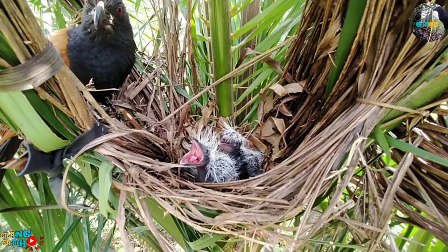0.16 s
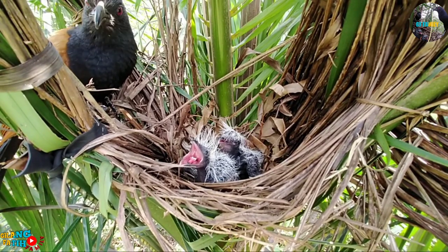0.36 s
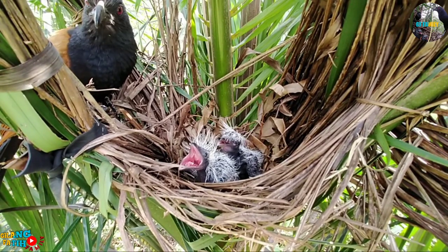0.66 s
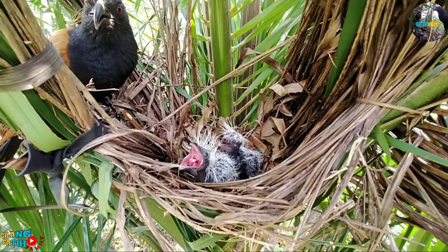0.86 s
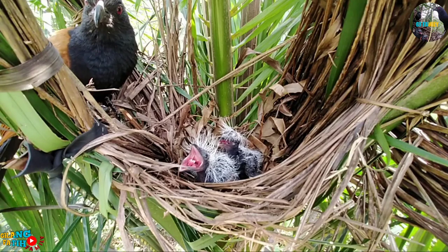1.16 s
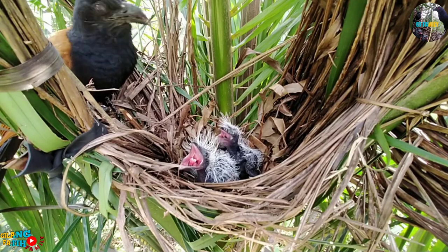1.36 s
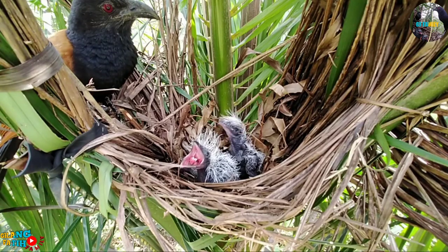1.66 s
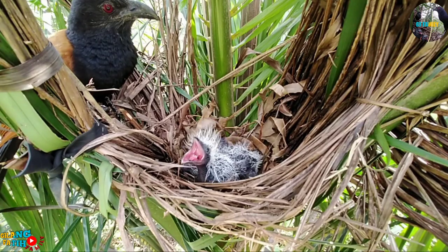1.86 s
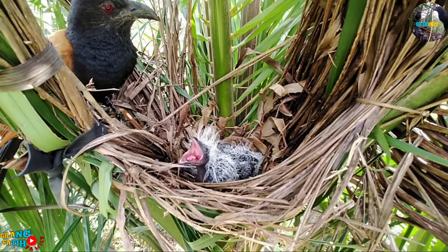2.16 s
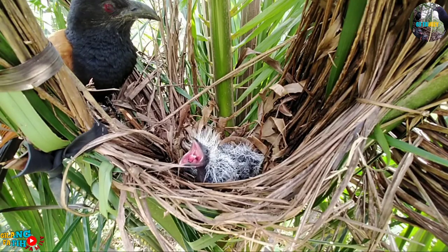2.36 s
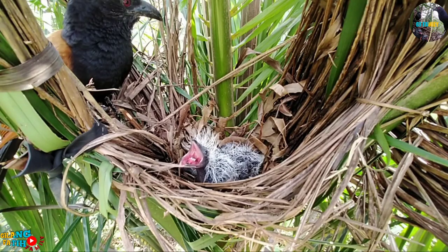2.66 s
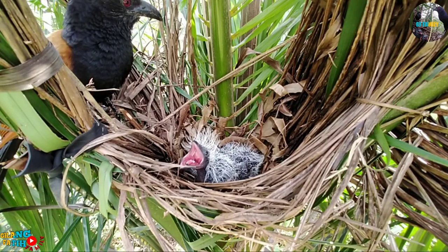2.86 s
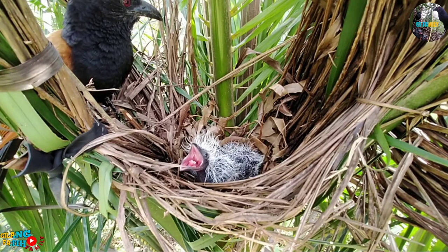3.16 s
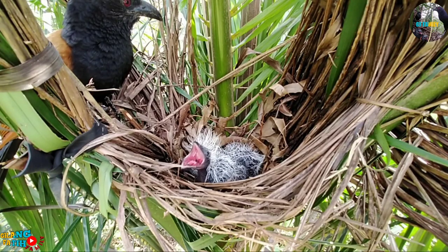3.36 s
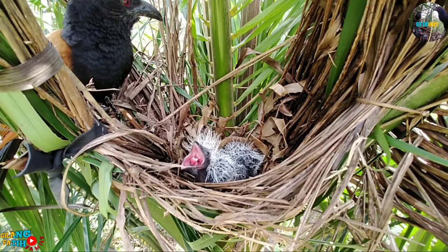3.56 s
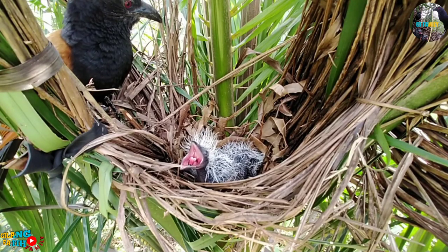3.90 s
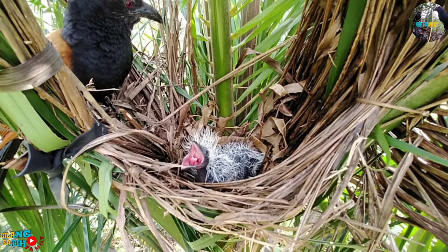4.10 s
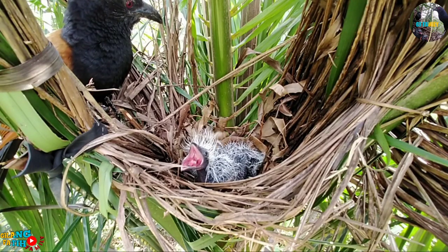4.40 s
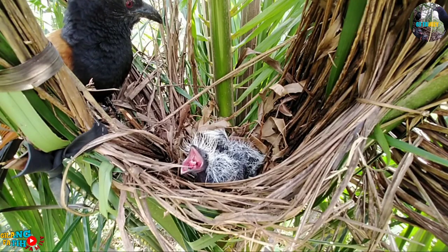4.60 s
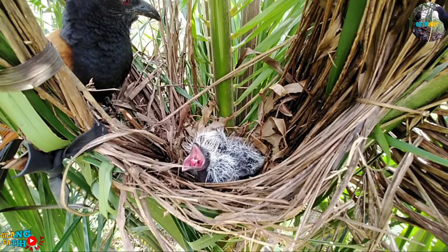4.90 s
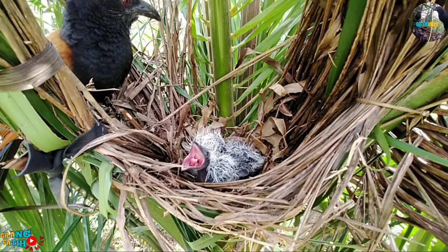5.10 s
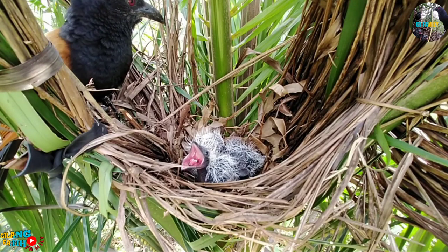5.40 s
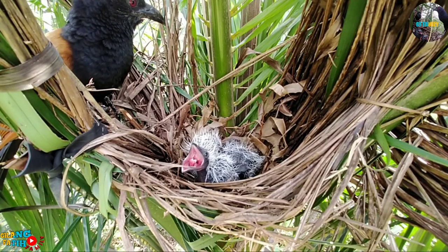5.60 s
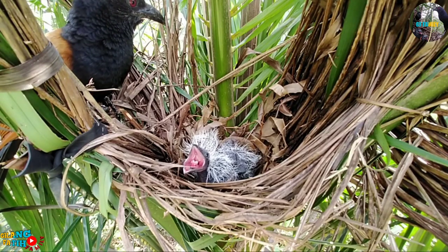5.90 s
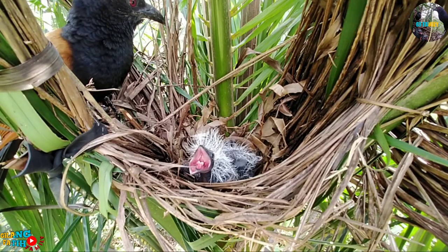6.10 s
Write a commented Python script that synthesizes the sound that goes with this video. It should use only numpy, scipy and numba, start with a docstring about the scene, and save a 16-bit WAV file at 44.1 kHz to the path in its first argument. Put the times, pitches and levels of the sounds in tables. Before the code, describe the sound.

Bright, gritty hissing calls dominate from the start, each swelling and dying with tiny gaps filled by faint wheezing air. Four long calls give way to steady short pulses, about three a second. Small hoarse peeps from another nestling sit beneath. Distant birds give short whistles and a quick trilled phrase three times. Close, centred pickup in open leafy surroundings, little reverberation, low wind and engine rumble.

```python
"""From the start two nestlings beg in a nest of dry palm leaves, close up, over wind rumble and a far engine's drone.
One rasps in pushes, in long calls and then mostly short ones: irregular clicks of the syrinx ring throat
and beak and crowd into a hiss, with faint wheezing air between. The other squeaks softly in arched notes.
From 0.65 s birds further off whistle, gliding tones; at 1.8, 2.8 and 5.6 s dry leaves crackle under the chicks.
From 2.4 s one of the birds sings a trilled phrase, three times in all."""
import sys
import numpy as np
from scipy import signal
from scipy.fft import rfft, irfft
from scipy.io import wavfile
from scipy.ndimage import uniform_filter1d
from numba import njit

SR = 44100
rng = np.random.default_rng(int(sys.argv[2]) if len(sys.argv) > 2 else 0)


def generate_wav(signal):
    """Clip the signal to [-1, 1] and save it as 16-bit WAV at the path in sys.argv[1]."""
    frames = np.transpose(np.atleast_2d(signal))
    scaled = np.clip(frames, -1, 1) * 32767
    pcm = np.round(scaled).astype(np.int16)
    wavfile.write(sys.argv[1], SR, pcm)


N = 275625
TIME = np.arange(N) / SR  # [s]


def undb(db):
    """Decibels to gain."""
    return 10 ** (np.asarray(db) / 20)


def unit(x):
    """Scale to rms 1."""
    return x / np.sqrt(np.mean(x ** 2))


def curve(rows):
    """Join (time [s], value) rows by straight lines."""
    return np.interp(TIME, *np.transpose(rows))


def walk(rate):
    """Smooth random wander with a spread near 1, taking this many steps a second."""
    steps = rng.standard_normal(N // 10)
    return np.interp(TIME * rate, np.arange(len(steps)), steps)


def ring(modes, size=2048):
    """Causal response, of energy 1, of a cavity with steep resonances."""
    f = np.arange(size // 2 + 1) * SR / size
    power = sum(undb(db) ** 2 / (1 + (2 * (f - hz) / width) ** 2) ** 2 for hz, width, db in modes)
    # folding the cepstrum to positive times gives minimum phase
    cepstrum = irfft(np.log(power))[:size // 2]
    cepstrum[0] /= 2
    response = irfft(np.exp(rfft(cepstrum, size)))
    return response / np.sqrt(np.sum(response ** 2))


def through(x, response):
    """Pass a sound through a response."""
    return signal.fftconvolve(x, response)[:N]


def highpass(x, order, hz):
    """Remove what lies below a frequency."""
    return signal.sosfilt(signal.butter(order, hz, "high", fs=SR, output="sos"), x)


def samples_of(start, length):
    """Indices of the samples that an event covers."""
    return np.flatnonzero((TIME >= start) & (TIME < start + length))


def note(start, length):
    """A note: its samples, the time since its start and its rounded envelope."""
    span = samples_of(start, length)
    t = TIME[span] - start
    return span, t, np.sqrt(np.abs(np.sin(np.pi * t / length)))


def pure_tone(hz):
    """A sine that follows a moving pitch, rms 1."""
    return unit(np.sin(2 * np.pi * np.cumsum(hz) / SR))


def foliage(x, wet_db, t60):
    """Leaves scatter a short diffuse tail behind the direct sound."""
    t = TIME[:SR // 2]
    tail = rng.standard_normal(len(t)) * undb(-60 * t / t60)
    return x + undb(wet_db) * through(x, tail / np.sqrt(np.sum(tail ** 2)))


# resonances of the engine drone: (frequency [Hz], width [Hz], level [dB])
ENGINE_MODES = [(60.6, 11.3, 0.5), (92.9, 7.4, 3), (121.6, 14.7, 1), (157.2, 17, 0), (194.7, 11, -0.5),
                (242.68, 52, -5.5)]
# drone level ahead of its trim: (time [s], level [dB])
ENGINE_LEVEL = [(0.0, -35.5), (0.98, -33.5), (1.68, -39), (5.49, -36), (6.1, -39.5)]


def engine(trim_db=-0.5):
    """A far engine drones: noise through narrow low resonances."""
    drone = through(rng.standard_normal(N), ring(ENGINE_MODES, size=32768))
    return unit(drone) * undb(curve(ENGINE_LEVEL) + trim_db)


# relative spectrum of the open air: (frequency [Hz], density [dB per Hz])
AIR_SPECTRUM = [(25, 6), (60, 3), (130, 0.5), (240, -10.5), (320, -7.5), (500, -9.5), (900, -8),
                (1500, -27), (3000, -31), (5000, -53), (9000, -40), (15000, -16.5)]
# wind level around which it swells: (time [s], level [dB])
WIND_LEVEL = [(0, -36), (2, -40), (4.3, -42), (5.5, -37)]


def wind(swell_db=2.5):
    """Soft wind rumble with a faint hiss: shaped noise that swells a little."""
    hz, density_db = np.transpose(AIR_SPECTRUM)
    f = np.maximum(np.arange(N // 2 + 1) * SR / N, 1)
    shape = undb(np.interp(np.log(f), np.log(hz), density_db))
    noise = irfft(rfft(rng.standard_normal(N)) * shape, N)
    return unit(noise) * undb(curve(WIND_LEVEL) + swell_db * walk(3.6))


# level or gliding bird notes: (time [s], length [s], start pitch [Hz], end pitch [Hz], level [dB])
WHISTLES = [(0.651, 0.03892, 4200, 4130, -36), (0.816, 0.03807, 4090, 4040, -27.5),
            (2.095, 0.047335, 4600, 5400, -44), (3.1, .26, 2045, 2066, -41.5),
            (3.29, 0.054, 2850, 2800, -43), (3.304, 0.0463, 3500, 5200, -48),
            (3.343, 0.03, 4000, 3200, -28.5), (4.245, .119, 2290, 2293, -52.5),
            (4.309, 0.071, 2500, 4320, -43), (5.276, .117, 2009, 1999, -42)]


def whistles(waver=0.00646):
    """Birds in the trees whistle single notes, pure tones whose glide levels off."""
    out, bend = np.zeros(N), 1 + waver * walk(200)
    for start, length, from_hz, to_hz, db in WHISTLES:
        span, t, envelope = note(start, length)
        hz = to_hz + (from_hz - to_hz) * (1 - t / length) ** 2
        out[span] += pure_tone(hz * bend[span]) * envelope ** 2 * undb(db)
    return out


def arch(u, from_hz, turn_hz, to_hz, place):
    """Pitch that eases into a turning point and curves away to its end as u runs from 0 to 1."""
    place = np.clip(place, .02, .98)
    before = (from_hz - turn_hz) * (1 - u / place) ** 2
    after = (to_hz - turn_hz) * ((u - place) / (1 - place)) ** 2
    return turn_hz + np.where(u < place, before, after)


# pip, trilled fall and rise: (time into the phrase [s], length [s], start pitch [Hz], turning pitch [Hz],
# end pitch [Hz], place of the turn [0-1], level within the song [dB], trill depth [Hz])
PHRASE = [(0, .025, 4048, 4200, 4143, .4, 0, 0), (.024, 0.033, 4100, 3830, 3420, 0.09, -3.5, 460),
          (0.067, .045, 3090, 3855, 3830, .45, -3.5, 80)]
# each singing of the phrase: (time [s], level [dB])
SONGS = [(2.404, -31), (4.605, -30.5), (5.949, -32)]


def songs(waver=0.00646, trill_hz=115):
    """A small bird repeats a phrase of curved pure tones, some shaken by a fast trill."""
    out, bend = np.zeros(N), 1 + waver * walk(200)
    for start, song_db in SONGS:
        for after, length, *shape, db, depth_hz in PHRASE:
            span, t, envelope = note(start + after, length)
            trill = depth_hz * np.sin(2 * np.pi * trill_hz * t)
            hz = arch(t / length, *shape) + trill
            out[span] += pure_tone(hz * bend[span]) * envelope ** 2 * undb(song_db + db)
    return out


# resonances of a dry leaf: (frequency [Hz], width [Hz], level [dB])
LEAF_MODES = [(2310.5, 2600, -1), (6500, 1150, 0.5), (7997, 1800, 2.5), (11856, 1500, -4), (14155, 3480, 4)]
# chicks shift on the dry leaves: (time [s], length [s], level into the leaf [dB], density [crackles/s])
RUSTLES = [(1.78, 0.06, -22.5, 826.5), (2.793, 0.061, -29.5, 3000), (5.634, 0.066, -36, 1360)]


def rustles(scatter_db=-2.0):
    """Short flurries of random snaps of either sign ring the dry leaves."""
    snaps = np.zeros(N)
    for start, length, db, rate in RUSTLES:
        span = samples_of(start, length)
        count = len(span)
        struck = rng.random(count) < rate / SR
        strength = undb(scatter_db * rng.standard_normal(count)) * rng.choice([-1, 1], count)
        snaps[span] += unit(struck * strength * np.hanning(count) ** .5) * undb(db)
    return through(snaps, ring(LEAF_MODES))


SCOOP_S, DROP_HZ, DROP_S = 0.0357, 110, 0.03  # pitch scoops up at the start and drops at the end
SPEAK_S, FADE_POWER = 0.016, 0.25  # a squeak speaks quickly and then fades
HOARSE_PER_S = 1.5  # phase flutter [rad] for each second of note length
# the second chick: (time [s], length [s], pitch [Hz], scoop up to it [Hz], sag over the note [Hz],
# level ahead of the envelope [dB], throat resonance [Hz])
SQUEAKS = [(-.02, .058, 830, 100, 29, -37, 1251), (0.181, .19, 906, 79.6, 80.5, -24.5, 2700),
           (.432, 0.21, 886, 70, 35.5, -24, 2580), (0.844, 0.21, 872.5, 70.2, 25, -23.5, 2620),
           (1.105, 0.11, 901, 60.1, 62, -24.5, 2740), (1.39, .118, 1169, 448, 260.5, -22.5, 2570),
           (1.787, 0.052, 992, 130.7, -45, -28, 1567), (1.933, 0.05, 1096, 140, 62, -28, 1660),
           (2.544, 0.045, 1054, 99.4, 43, -25.5, 1780), (2.678, 0.059, 1030, 99.7, 68, -34, 1598),
           (3.196, 0.0483, 1044, 120.4, 13, -31, 1400), (3.56, 0.066, 1061, 90.1, 96, -31, 1199),
           (4.944, 0.058, 893, 190.8, 36, -28, 1400), (6.058, 0.057, 1051, 100, 60, -26, 1856),
           (6.21, 0.065, 1015, 110, -20, -27, 1820)]


def squeaks(waver=0.0098, drift=0.0087, shimmer_db=3, throat_width_hz=1000, throat_db=23.0, slope_db=-9):
    """Nasal arched notes of five harmonics, the long ones hoarse; the throat lifts harmonics near its resonance."""
    out = np.zeros(N)
    bend = 1 + waver * walk(250) + drift * walk(25)
    tremble = undb(shimmer_db * walk(150))
    flutter = walk(600)  # uneven cycles smear the upper harmonics most
    k = np.arange(1, 6)[:, None]  # harmonic numbers
    for start, length, pitch_hz, scoop_hz, sag_hz, db, throat_hz in SQUEAKS:
        span, t, _ = note(start, length)
        envelope = np.minimum(t / SPEAK_S, 1) * np.abs(1 - t / length) ** FADE_POWER
        scoop = np.maximum(1 - t / SCOOP_S, 0) ** 2
        drop = np.maximum(1 - (length - t) / DROP_S, 0) ** 2
        hz = (pitch_hz - sag_hz * t / length - scoop_hz * scoop - DROP_HZ * drop) * bend[span]
        throat = undb(throat_db) / (1 + (2 * (k * hz - throat_hz) / throat_width_hz) ** 2) ** 2
        gain = undb(slope_db * np.log2(k)) * (1 + throat)
        phase = 2 * np.pi * np.cumsum(hz) / SR + HOARSE_PER_S * length * flutter[span]
        tone = np.sum(gain * np.sin(k * phase), axis=0)
        out[span] += unit(tone) * envelope * tremble[span] * undb(db)
    return out


# open beak as the air wheezes through: (frequency [Hz], width [Hz], level [dB])
WHEEZE_MODES = [(2745.3, 4300, -9), (6230, 1500, -40.5), (8130, 540, 1.5), (9430, 1800, -0.5),
                (11700, 2000, -17.5), (14660, 1460, -9)]


def wheeze():
    """Air noise whistles faintly through the open beak all along, heard between rasps."""
    db = curve([(end, wheeze_db) for _, end, _, wheeze_db in RASPS])
    return through(rng.standard_normal(N), ring(WHEEZE_MODES)) * undb(db + 2.2 * walk(70))


ATTACK_S, RELEASE_S, EDGE_POWER = .048, .06, .7  # every rasp swells and dies away alike
TIRE_AFTER_S, TIRE_DB_PER_S = .29, 11  # a long rasp runs out of air
# pressure sinks slowly into a lull, comes back quickly and overshoots a moment later
SINK_S, RECOVER_S, SURGE_DB, SURGE_AFTER_S, SURGE_S = .042, .021, 1.32, .055, .03
# begging rasps: (start [s], end [s], pressure ahead of tiring and lulls [dB],
# wheeze around which it wavers at the rasp's end [dB])
RASPS = [(-.2, 0.043, -8.5, -41.5), (0.12, 0.616, -8.5, -41), (0.696, 1.182, -8.5, -36),
         (1.263, 1.745, -7.5, -31), (1.83, 2.092, -8, -40), (2.147, 2.413, -8.5, -40.5),
         (2.479, 2.792, -8, -32.5), (2.866, 3.289, -8.5, -41), (3.366, 3.631, -8, -38),
         (3.676, 3.946, -8.5, -43.5), (4.022, 4.295, -8.5, -42), (4.36, 4.633, -9, -41),
         (4.703, 4.962, -7, -34), (5.015, 5.286, -7.5, -42.5), (5.35, 5.629, -8, -32.5),
         (5.7, 5.969, -7.5, -41), (6.029, 6.302, -7, -41.5)]
# the chick eases off between pushes: (time [s], depth [dB])
LULLS = [(.309, 12), (.466, 4.5), (.868, 7.5), (1.033, 8), (1.447, 8.5), (1.598, 7), (1.958, 3.5),
         (2.274, 3.5), (2.638, 5), (2.987, 4), (3.137, 11), (3.482, 4.5), (3.803, 5), (4.156, 4.5),
         (4.486, 4.5), (4.824, 3.5), (5.138, 3), (5.491, 4), (5.82, 2.5), (6.158, 3.5)]


def pressure():
    """Air pressure of the rasping chick, as a gain: attack, hold and release, with a surge after each lull."""
    push = np.zeros(N)
    for start, end, db, _ in RASPS:
        edges = np.clip((TIME - start) / ATTACK_S, 0, 1) * np.clip((end - TIME) / RELEASE_S, 0, 1)
        tired_db = TIRE_DB_PER_S * np.maximum(TIME - start - TIRE_AFTER_S, 0)
        push += edges ** EDGE_POWER * undb(db - tired_db)
    eased_db, surge_db = np.zeros(N), np.zeros(N)
    for s, depth_db in LULLS:
        eased_db += depth_db * np.exp(-np.maximum((s - TIME) / SINK_S, (TIME - s) / RECOVER_S))
        surge_db += SURGE_DB * np.exp(-((TIME - s - SURGE_AFTER_S) / SURGE_S) ** 2)
    return uniform_filter1d(push * undb(surge_db - eased_db), size=380).clip(0)


@njit
def clicks(rate, stretch, size):
    """A click at each wrap of the phase; every cycle has its own length and strength."""
    out, phase, k = np.zeros(len(rate)), 0., 0
    for i in range(len(rate)):
        phase += rate[i] / SR
        if phase >= stretch[k]:
            phase -= stretch[k]
            out[i] = size[k]
            k += 1
    return out


def syrinx(rate, jitter, scatter_db):
    """One side of the syrinx: uneven snaps at a moving rate, rms 1."""
    chance = rng.standard_normal((N // 10, 2)).T
    stretch = np.exp(jitter * chance[0] - jitter ** 2 / 2)
    train = highpass(clicks(rate, stretch, undb(scatter_db * chance[1])), 1, 500)
    return unit(train * np.sqrt(SR / rate))  # evens out power as the clicks crowd


GAPE_DB, GAPE_DB_PER_S = -0.35, 0.33  # the gape widens as the begging goes on and lifts the top
# throat, beak and nest cup: (frequency [Hz], width [Hz], level [dB])
BEAK_MODES = [(940, 530, -18.5), (1570, 1080, -20.5), (2870, 1700, -12.0), (4510, 1720, -19.5),
              (5720, 730, -7.5), (6130, 460, -7.5), (6590, 230, -12.0), (7150, 780, -7.0),
              (7630, 380, -0.5), (7990, 210, -2.5), (8300, 500, 0.0), (8830, 380, -1.5), (9160, 390, -2.5),
              (9720, 280, -7.0), (10290, 310, -1.0), (10850, 440, -4.0), (11350, 380, -1.0),
              (12070, 710, -1.5), (12550, 320, -2.5), (12910, 410, -3.0), (13430, 230, -7.5),
              (14040, 700, -2.0), (14770, 460, -5.0), (15220, 430, -6.5)]


def rasp(full_db=-8, loose_hz=1300, loose_db=-3.0, air_db=-15, brightening=0.39):
    """Pressure sets loudness, click rate and brightness: a rattle at a call's edges, a dense hiss at its height."""
    push = pressure()
    effort = push / undb(full_db)
    # one side snaps almost evenly and leaves a faint gliding tone; the loose side joins in as the chick pushes
    even = syrinx(400 + 680 * effort ** 2, jitter=.09, scatter_db=2.5)
    loose = syrinx(200 + loose_hz * effort ** 2, jitter=.5, scatter_db=-1.5)
    share = undb(loose_db) * (effort + 0.93)
    breath = undb(air_db) * rng.standard_normal(N)
    source = (even + share * loose) / np.hypot(1, share) + breath
    voice = through(source * push, ring(BEAK_MODES))
    top = signal.sosfiltfilt(signal.butter(2, 11500, "high", fs=SR, output="sos"), voice)
    low = signal.sosfiltfilt(signal.butter(4, 7000, "low", fs=SR, output="sos"), voice)
    tilt = undb(GAPE_DB + GAPE_DB_PER_S * TIME) * (effort + 0.15) ** brightening
    return voice + (tilt - 1) * top + (tilt ** -.6 - 1) * low


def wobble(x, depth=0.15, rate=14):
    """The chick's head trembles, so near reflections from the nest cup wax and wane and shift the colour."""
    lags = rng.integers(8, 50, 3)  # [samples]
    return x + sum(depth * walk(rate) * np.pad(x, (lag, 0))[:N] for lag in lags)


def scene(rasp_db=-0.6):
    """The nest lies straight ahead, alike in both channels; the far birds sound wetter."""
    chicks = undb(rasp_db) * wobble(rasp()) + wheeze() + squeaks()
    nest = foliage(chicks + rustles(), wet_db=-8.5, t60=0.072)
    birds = foliage(songs() + whistles(), wet_db=-4.5, t60=0.2491)
    mid = nest + birds + wind() + engine()
    return np.array([mid, mid])


TOP_HZ = 15550  # treble cut of the recorder


def record(dry, count=3):
    """The recorder blocks the sub-bass, rounds the tallest clicks and cuts the top."""
    out = highpass(dry, 1, 15)
    for _ in range(count):  # the treble cut makes peaks overshoot, so they are rounded in stages
        out = out / (1 + np.abs(out / .97) ** 10) ** (1 / 10)
        out = signal.fftconvolve(out, signal.firwin(401, TOP_HZ, fs=SR)[None], mode="same")
    return out


dry = scene()
out = record(dry)
generate_wav(out)
```